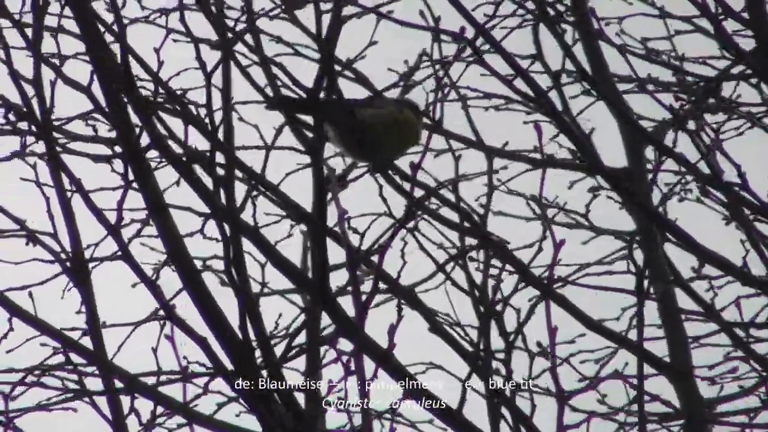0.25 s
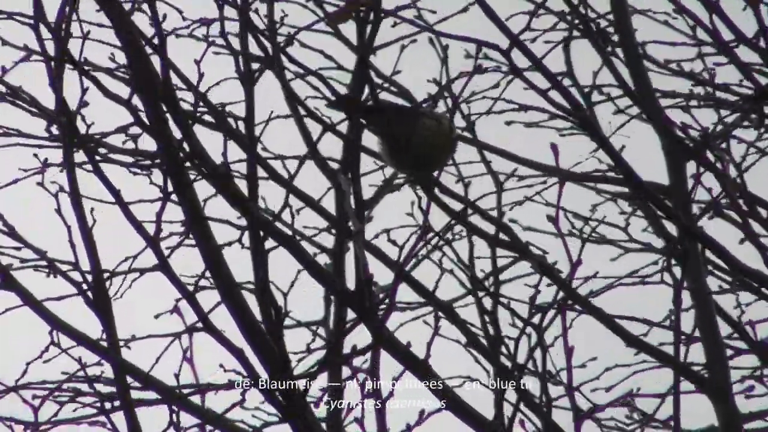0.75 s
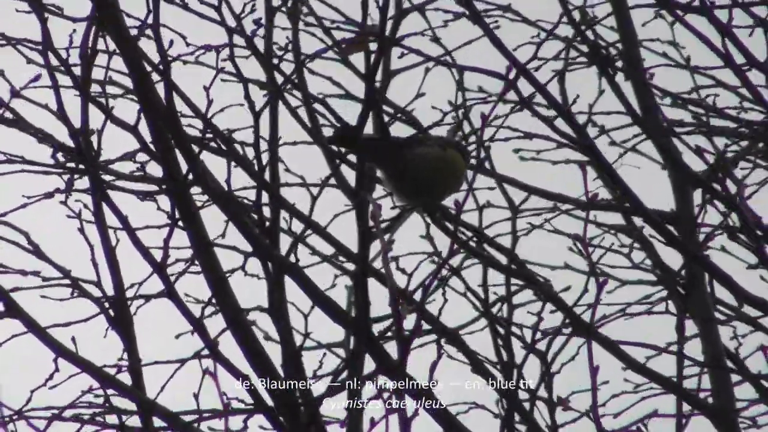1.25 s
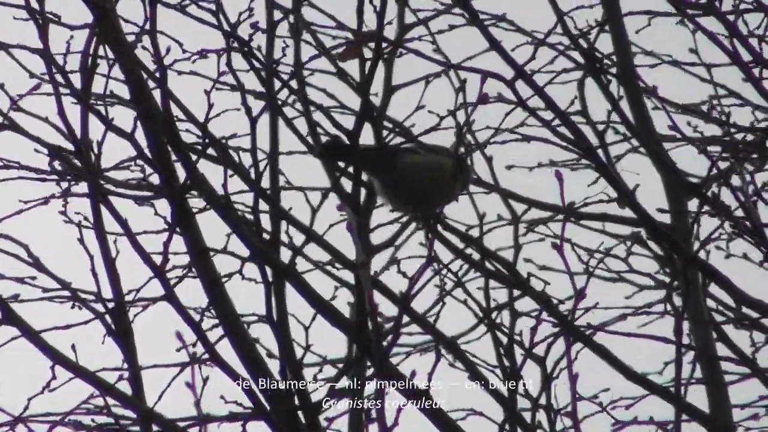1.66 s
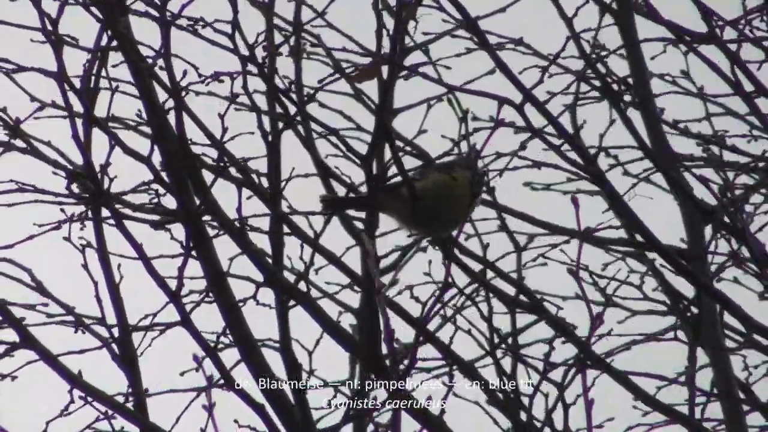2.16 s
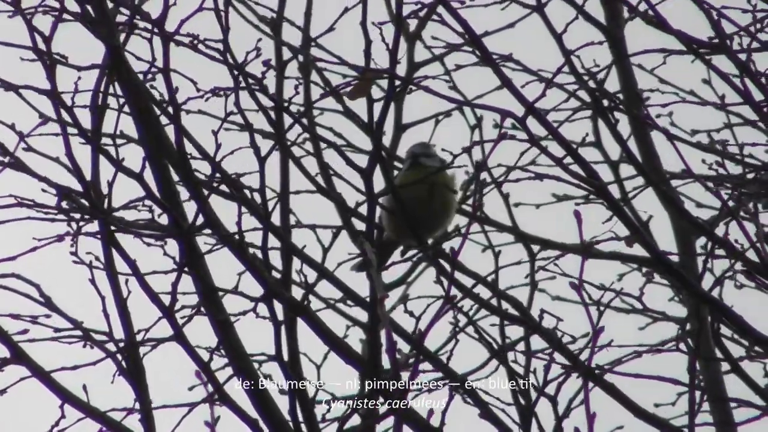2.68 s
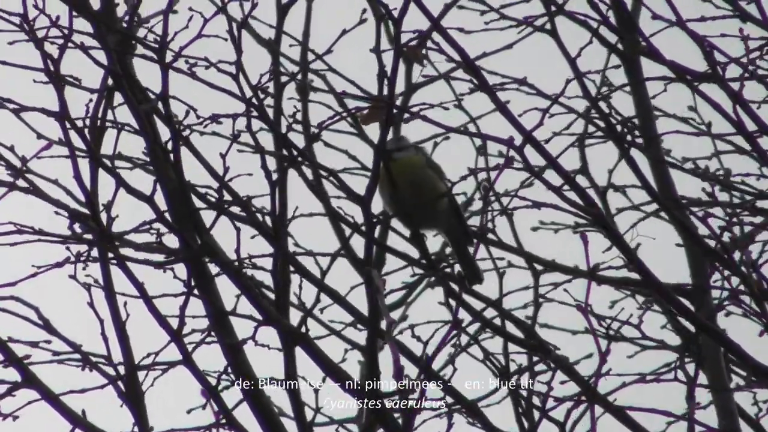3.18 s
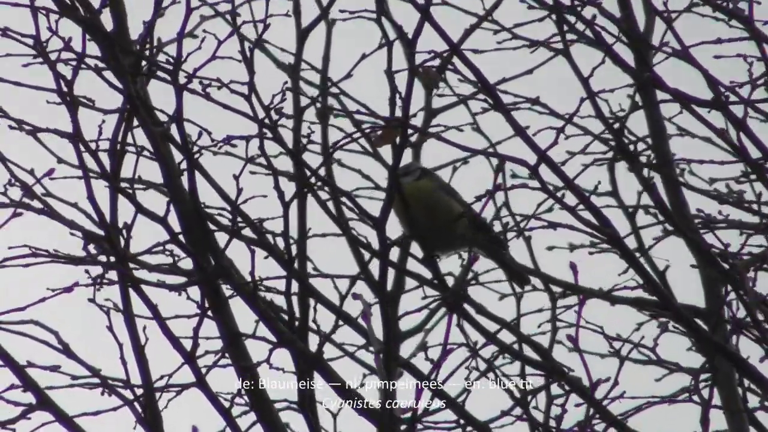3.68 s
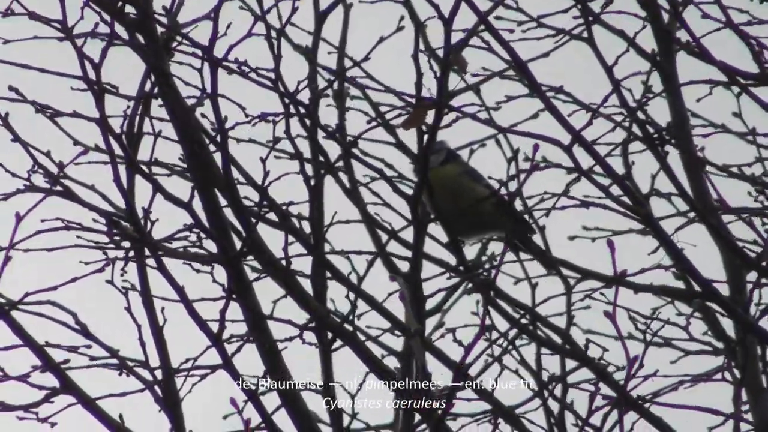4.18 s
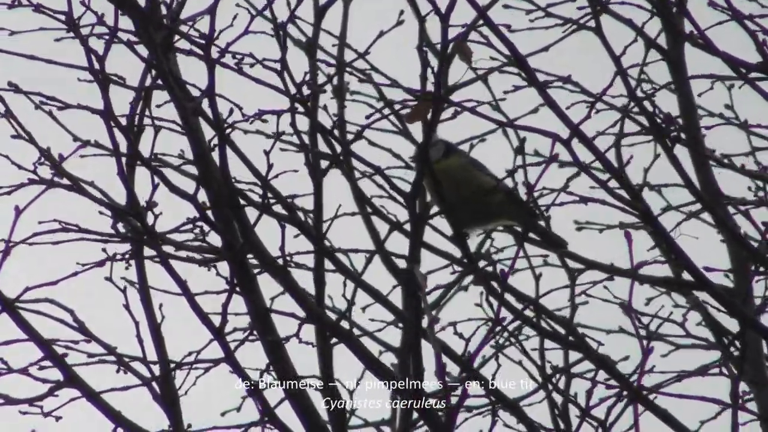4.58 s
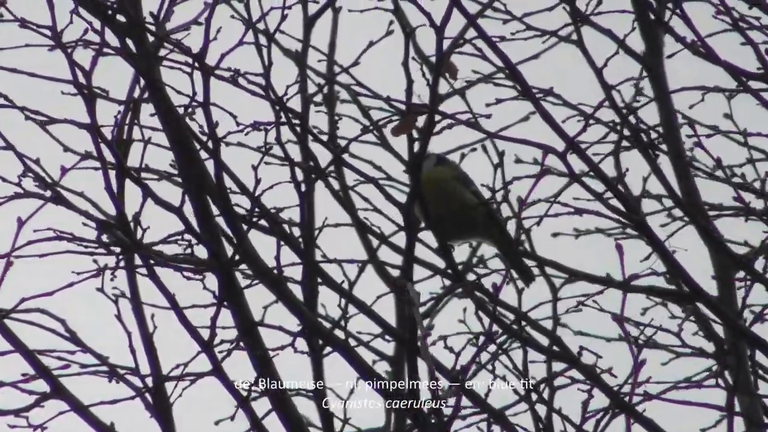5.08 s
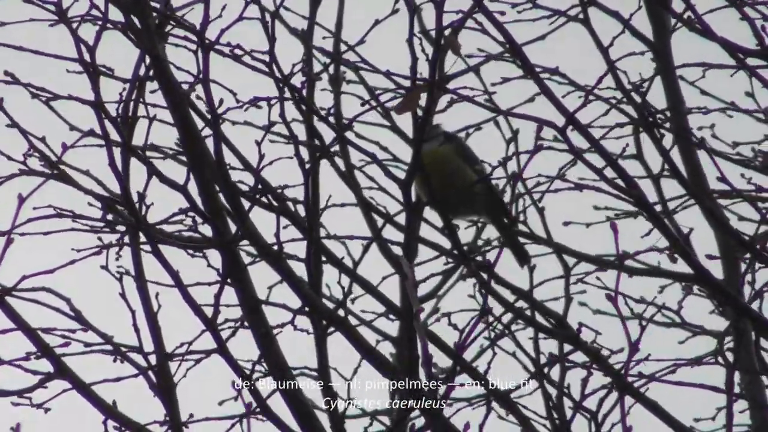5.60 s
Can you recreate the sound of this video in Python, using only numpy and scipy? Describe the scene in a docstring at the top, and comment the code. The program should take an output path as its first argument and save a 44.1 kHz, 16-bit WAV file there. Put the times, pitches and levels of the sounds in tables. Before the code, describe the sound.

Thin, high trills and two descending whistles from a small songbird outdoors, with far traffic rumbling underneath.

```python
"""A blue tit sings in a bare tree: the end of a trill, two high falling whistles, then a new trill. Its syrinx
makes a nearly pure tone that flutters as echoes from the surroundings mix with it. Distant traffic rumbles
below; a camera adds microphone hiss and short whirrs of its lens motor. A breeze buffets the microphones, a far
bird calls faintly, a high rustle comes up and a faint dry tick sounds."""
import sys
import numpy as np
from scipy import signal
from scipy.fft import rfft, irfft
from scipy.io import wavfile

SR = 44100
rng = np.random.default_rng(int(sys.argv[2]) if len(sys.argv) > 2 else 0)


def wav_out(sig):
    """Save sig, one row per channel (or a flat mono array), as 16-bit PCM at SR to the path in sys.argv[1]."""
    wavfile.write(sys.argv[1], SR, np.round(np.clip(np.atleast_2d(sig).T, -1, 1) * 32767).astype(np.int16))


N = 257544


def from_db(db):
    """Decibels to gain."""
    return 10 ** (np.asarray(db) / 20)


def clock():
    """Sample times [s]."""
    return np.arange(N) / SR


def in_time(rows):
    """Value columns of a (time, ...) table at every sample."""
    time_s, *columns = np.transpose(rows)
    return [np.interp(clock(), time_s, column) for column in columns]


def at_bins(points, beyond=None):
    """A (frequency, value) table at every FFT bin, interpolated over log frequency."""
    hz, value = np.transpose(points)
    log_bins = np.log(np.fft.rfftfreq(N, 1 / SR) + 1e-9)
    return np.interp(log_bins, np.log(hz), value, left=beyond, right=beyond)


def gate(start_s, end_s, edge_s):
    """Window with linear ramps."""
    return np.clip(np.minimum(clock() - start_s, end_s - clock()) / edge_s + .5, 0, 1)


def bump(at_s, width_s):
    """Bell of height 1."""
    return np.exp(-((clock() - at_s) / width_s) ** 2)


def drift(rate_hz):
    """Unit-variance noise, low-passed at rate_hz."""
    slow = irfft(rfft(rng.standard_normal(N)) / (1 + (np.fft.rfftfreq(N, 1 / SR) / rate_hz) ** 4), N)
    return slow / slow.std()


def stereo_noise(spectrum, alike, pan_db=0, lead_rad=0):
    """Coloured noise in two partly coherent channels, left leading; their mean has rms 1."""
    mid, side = rfft(rng.standard_normal((2, N))) * from_db(at_bins(spectrum, -np.inf))
    sides = np.array([[1], [-1]])
    placing = from_db(sides * pan_db / 2) * np.exp(.5j * sides * lead_rad)
    pair = irfft((np.sqrt(1 + alike) * mid + sides * np.sqrt(1 - alike) * side) * placing, N)
    return pair / pair.mean(axis=0).std()


def syrinx(hz, rms, overtone_db, waver=0.0026):
    """Bird voice: a slightly unsteady sine with a faint octave."""
    phase = 2 * np.pi * np.cumsum(hz * (1 + waver * drift(332))) / SR
    return np.sqrt(2) * rms * (np.sin(phase) + from_db(overtone_db) * np.sin(2 * phase))


def flick(remaining_s, flick_s=.008):
    """Progress (0-1) of a note's closing pitch drop."""
    return np.exp(-np.maximum(remaining_s, 0) / flick_s)


def trill(slide_s=0.016, sag_hz_per_s=480, flick_hz=443, edge_s=0.0047):
    """Each note slides onto its pitch, swells, then flutters and droops as it closes."""
    # (start [s], length [s], middle pitch [Hz], opening slide [Hz], level [dB], flutter depth [ratio])
    notes = [(-0.045, 0.11, 4940, 5, -66, 0.5), (0.036, .085, 4860, 180, -42, 0.7),
             (0.167, 0.071, 4850, 70, -42, 0.35), (0.28, 0.082, 4842, 20, -40, 0.34),
             (0.415, 0.083, 4814, 43, -41.5, 0.44), (0.546, 0.087, 4850, 10, -41, 0.2),
             (3.968, 0.075, 5042, 350, -36.5, 0.19), (4.098, 0.079, 5000, 150, -37, 0.12),
             (4.218, 0.093, 4930, 30, -41.5, 0.1), (4.349, 0.078, 4910, 68, -40.5, 0.83),
             (4.482, 0.077, 4855, 53, -42, 0.56), (4.611, 0.084, 4845, 69, -40.5, 0.75),
             (4.749, 0.08, 4810, 73, -43, 1.23)]
    crest_share, swell_db, close_db = 0.57, 17.5, 28.5
    hz = np.full(N, float(notes[0][2]))
    gain, depth = np.zeros((2, N))
    for start_s, length_s, middle_hz, slide_hz, level_db, flutter in notes:
        on = (clock() >= start_s) & (clock() <= start_s + length_s)
        age_s = clock()[on] - start_s
        progress = age_s / length_s
        hz[on] = middle_hz + slide_hz * np.exp(-(age_s / slide_s) ** 2)
        hz[on] -= sag_hz_per_s * (age_s - length_s / 2) + flick_hz * flick(length_s - age_s)
        shape_db = -swell_db * np.maximum(1 - progress / crest_share, 0) ** 2
        shape_db -= close_db * np.maximum((progress - crest_share) / (1 - crest_share), 0) ** 2.48
        edges = np.minimum(1, np.minimum(age_s, length_s - age_s) / edge_s)
        gain[on] = from_db(level_db + shape_db) * edges
        depth[on] = flutter * progress
    flutter_hz = 90 + 25 * drift(44)
    flutter_phase = 2 * np.pi * np.cumsum(flutter_hz) / SR
    gain *= (1 + depth * np.cos(flutter_phase)) / np.sqrt(1 + depth ** 2 / 2)
    return syrinx(hz + 60 * depth * drift(130), gain, overtone_db=-27.5, waver=0.0035)


def surroundings(song, scatter_db=-15, scatter_t60_s=0.35, tail_db=-29.5, tail_t60_s=1.8, width=0.085):
    """Direct sound, distinct echoes, scatter from the branches and a faint longer tail."""
    # off limbs, ground and walls: (delay [s], level [dB])
    echoes = [(.0047, -13), (.0098, -11), (.0172, -12.5), (.0265, -20.5), (.052, -35)]
    t = np.arange(SR) / SR
    response = np.zeros((2, SR))
    for level_db, t60_s in ((scatter_db, scatter_t60_s), (tail_db, tail_t60_s)):
        fade = np.exp(-np.log(1000) * t / t60_s) * (1 - np.exp(-t / 0.027))
        mid, side = rng.standard_normal((2, SR)) * fade / np.linalg.norm(fade)
        response += from_db(level_db) * np.array([mid + width * side, mid - width * side])
    response[:, 0] += 1
    for k, (delay_s, level_db) in enumerate(echoes):
        side_db = (-1) ** k * np.array([1.3, -1.3])
        response[:, int(delay_s * SR)] += from_db(level_db + side_db)
    return signal.fftconvolve(song[None], response, axes=1)[:, :N]


def drone(track, wander_hz, throb_db, trim_db=0):
    """A far engine's firing tone, unsteady in pitch and level, mostly leading on the left."""
    hz, level_db = in_time(track)
    phase = 2 * np.pi * np.cumsum(hz + wander_hz * drift(5.9)) / SR
    lead_rad = 0.36 + 0.34 * drift(13)
    rms = from_db(level_db + trim_db + throb_db * drift(9.7))
    return np.sqrt(2) * rms * np.sin(phase + lead_rad * np.array([[.5], [-.5]]))


def traffic(lead_rad=0.2, surge_db=4, drone_pan_db=-4.0):
    """Receding rumble, tyre roar dulled by distance and four engine drones, louder on the right."""
    # (time [s], rumble [dB], roar [dB])
    levels = [(0, -49, -52.5), (.7, -52.5, -52.5), (1.35, -51, -52.5), (3.2, -57, -57), (3.7, -54, -57),
              (4.6, -58, -57), (5.35, -55.5, -56), (5.84, -59.5, -56)]
    # (frequency [Hz], density [dB])
    rumble_spectrum = [(20, -13.5), (35, -0.5), (55, 3), (80, -2.5), (140, -1.5), (170, -1.5), (205, 1.5),
                       (240, 0), (310, -6), (420, -38)]
    roar_spectrum = [(220, -7), (310, -5), (380, 1.5), (460, -0.5), (550, -7.5), (700, -8), (900, -12.5),
                     (1100, -17.5), (1290, -29), (1460, -43.5), (1700, -39), (2150, -37.5), (2450, -49)]
    # (frequency [Hz], left-right coherence [0-1])
    coherence = [(55, .8), (250, .77), (600, .7), (1200, .8)]
    # (frequency [Hz], left minus right [dB])
    balance = [(30, -5), (80, -5.5), (170, -5), (350, -2.5), (700, -0.5), (1400, -0.5)]
    # engine tones: (time [s], pitch [Hz], level [dB])
    deep = [(0, 56.8, -56), (.95, 58.4, -52), (1.3, 59.5, -55.5), (2.3, 60.15, -49.5), (2.7, 59, -60),
            (2.95, 56.8, -51), (3.25, 57, -63), (4.3, 59, -57.5), (4.55, 57, -65), (4.65, 51.04, -54),
            (5.0, 50.6, -50), (5.35, 50.8, -63), (5.84, 52.2, -59.5)]
    low = [(0, 107, -55), (.65, 104, -69), (1.0, 103.1, -49.5), (1.4, 103, -55), (2.45, 102, -53.5),
           (2.85, 102, -72), (3.65, 104.2, -51.5), (4.0, 104.1, -69), (5.2, 105, -65), (5.43, 111, -67),
           (5.7, 112, -68)]
    middle = [(1.1, 141.3, -71), (2.0, 140, -55.5), (2.4, 140, -68), (2.75, 137, -62), (3.1, 135, -85)]
    high = [(0, 236, -54.5), (.45, 235, -57), (.8, 234, -73.5), (1.5, 234, -56.5), (1.9, 234, -86)]
    rumble_db, roar_db = in_time(levels)
    roar_db += surge_db * bump(at_s=3.95, width_s=0.021)
    placing = at_bins(coherence), at_bins(balance), lead_rad
    rumble = from_db(rumble_db) * stereo_noise(rumble_spectrum, *placing)
    roar = from_db(roar_db) * stereo_noise(roar_spectrum, *placing)
    engines = drone(deep, wander_hz=2.17, throb_db=2.5, trim_db=-2)
    engines += drone(low, wander_hz=1.2, throb_db=0.86, trim_db=-2.5)
    engines += sum(drone(track, wander_hz=1.55, throb_db=0.8) for track in (middle, high))
    return rumble + roar + engines * from_db([[drone_pan_db / 2], [-drone_pan_db / 2]])


def microphone_hiss(level_db=-68.5):
    """Steady self-noise, wider in the top treble."""
    # (frequency [Hz], density [dB])
    spectrum = [(1600, -8.5), (2000, -14.5), (2450, -16), (2950, -7), (3500, -11), (4400, -8),
                (5050, -12.5), (5900, -4), (7900, 2.5), (9500, 0.5), (15800, 0)]
    coherence = at_bins([(2000, 0.95), (6000, 1.0), (9000, 0.76), (14000, 0.14)])
    return from_db(level_db) * stereo_noise(spectrum, coherence)


def lens_motor():
    """Short, high whirrs of the focus drive."""
    # (start [s], end [s], level [dB])
    runs = [(0.292, 0.398, -65), (1.522, 1.869, -64.5), (2.526, 2.878, -65.5), (4.020, 4.142, -66.5),
            (5.808, 5.902, -64.5)]
    # (frequency [Hz], density [dB])
    spectrum = [(6500, -29), (7150, -5.5), (7500, -1), (7850, -3), (8200, 2), (8400, -6), (8620, 4),
                (8950, -21)]
    gain = sum(from_db(db) * gate(start_s, end_s, edge_s=.006) for start_s, end_s, db in runs)
    return gain * stereo_noise(spectrum, alike=0.97, pan_db=-1.1)


def breeze():
    """Eddies push the two microphone ports in opposite directions: a very deep flutter."""
    # (time [s], level [dB])
    gusts = [(0, -64), (1.7, -65), (1.92, -37), (2.15, -54), (2.45, -71), (4.1, -63), (5.0, -74)]
    level_db, = in_time(gusts)
    eddies = stereo_noise([(7, -13), (18, -3), (38, -3.0), (90, -27), (200, -34)], alike=0.87)[0]
    return from_db(level_db) * eddies * np.array([[1], [-1]])


def far_bird():
    """One faint note of nearly level pitch."""
    # (time [s], pitch [Hz], level [dB])
    call = [(2.402, 5170, -86), (2.425, 5100, -84), (2.490, 5210, -80), (2.506, 5200, -83)]
    hz, level_db = in_time(call)
    gain = from_db(level_db) * gate(call[0][0], call[-1][0], edge_s=0.0048)
    return syrinx(hz, gain, overtone_db=-52, waver=.012)


def rasps(chirps_per_s=310, swell_db=17):
    """Before each whistle the voice breaks into overlapping upward chirps that grow louder."""
    # (start [s], end [s], final level [dB])
    bursts = [(3.449, 3.475, -37), (3.715, 3.74, -42)]
    # along one chirp: (pitch [Hz], gain [dB])
    chirp = [(3600, -28), (5500, -8.5), (6900, -2.5), (8400, 0.5), (9800, -20), (12500, -28)]
    chirp_hz, chirp_db = np.transpose(chirp)
    voice = np.zeros(N)
    for start_s, end_s, level_db in bursts:
        remaining = np.clip((end_s - clock()) / (end_s - start_s), 0, 1)
        swell = from_db(level_db - swell_db * remaining ** 2) * gate(start_s, end_s, edge_s=0.0024)
        cycles = (clock() - end_s) * chirps_per_s / 2 + 0.078 * drift(150)
        for rise in (cycles % 1, (cycles + .5) % 1):
            hz = chirp_hz[0] + (chirp_hz[-1] - chirp_hz[0]) * rise
            gain = swell * from_db(np.interp(hz, chirp_hz, chirp_db))
            voice += syrinx(hz, gain, overtone_db=-45, waver=0.023)
    return voice


def whistles(leap_from_hz=3860, leap_s=.0052, sink_s=.098, flick_hz=250):
    """Two long notes leap up, sink and flick down, each with one dip and one accent in level."""
    # (start [s], length [s], top pitch [Hz], sinks toward [Hz], level [dB], dip [s], accent [s])
    notes = [(3.471, .157, 7714, 6200, -30, 3.527, 3.577), (3.739, .169, 7540, 6330, -32.5, 3.771, 3.786)]
    attack_s, hold_s, fade_db_per_s = .015, 0.047, 62
    dip_db, accent_db, stress_s, flutter_db = 12, 5.5, 0.0078, 2.5
    voice = np.zeros(N)
    for start_s, length_s, top_hz, low_hz, level_db, dip_at_s, accent_at_s in notes:
        age_s = np.clip(clock() - start_s, 0, length_s)
        hz = low_hz + (top_hz - low_hz) * np.exp(-(age_s / sink_s) ** 2.6)
        hz -= (top_hz - leap_from_hz) * np.exp(-age_s / leap_s)
        hz -= flick_hz * flick(length_s - age_s)
        shape_db = accent_db * bump(accent_at_s, stress_s) - dip_db * bump(dip_at_s, stress_s)
        shape_db += flutter_db * drift(90)
        shape_db -= fade_db_per_s * np.maximum(age_s - hold_s, 0)
        edges = np.minimum(age_s / attack_s, 1) * gate(start_s, start_s + length_s, edge_s=0.008)
        voice += syrinx(hz, from_db(level_db + shape_db) * edges, overtone_db=-45)
    return voice


def rustle():
    """A soft high hush that comes up toward the end of the song."""
    # (time [s], level [dB])
    levels = [(0, -97), (1, -95), (3.3, -99), (4.1, -76.5), (4.8, -69.5), (5.05, -65.5), (5.25, -70),
              (5.84, -68.5)]
    # (frequency [Hz], density [dB])
    spectrum = [(2400, -28), (2900, -13), (3600, -20), (4600, -16), (5100, -19.5), (5800, -4.5),
                (7200, -2.5), (8500, -5.5), (10500, -19)]
    level_db, = in_time(levels)
    return from_db(level_db) * stereo_noise(spectrum, alike=1.0)


def tick(at_s=4.4455, level_db=-66, decay_s=0.0085):
    """One faint dry tick."""
    fade = (clock() >= at_s) * np.exp(-np.abs(clock() - at_s) / decay_s)
    noise = stereo_noise([(1700, -12), (2600, -2), (4200, 0), (9000, -11)], alike=1.0)
    return from_db(level_db) * fade * noise


def scene(whistle_db=-1.0, trill_db=-0.67, bird_pan_db=-.6):
    """Stereo mix, birds almost straight ahead."""
    song = from_db(whistle_db) * (whistles() + rasps()) + from_db(trill_db) * trill() + far_bird()
    birds = surroundings(song) * from_db([[bird_pan_db / 2], [-bird_pan_db / 2]])
    return birds + tick() + traffic() + breeze() + rustle() + microphone_hiss() + lens_motor()


def record(dry):
    """Steep elliptic low-pass."""
    cutoff_hz = 15750
    return signal.sosfilt(signal.ellip(12, .1, 80, cutoff_hz, fs=SR, output="sos"), dry)


dry = scene()
out = record(dry)
wav_out(out)
```